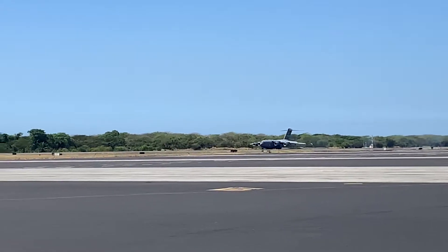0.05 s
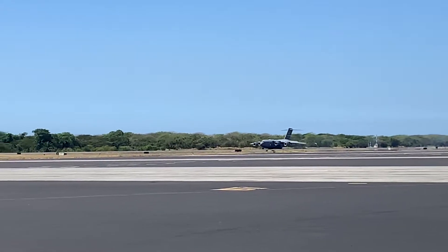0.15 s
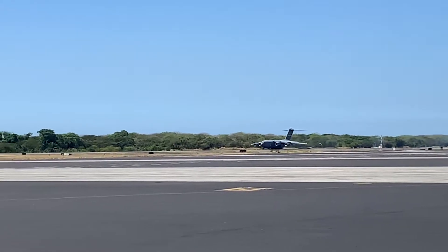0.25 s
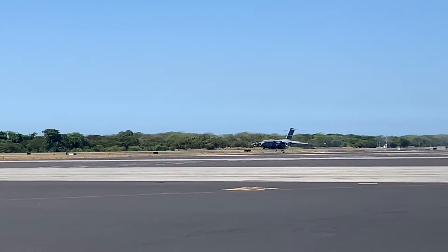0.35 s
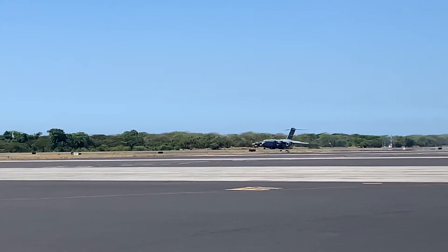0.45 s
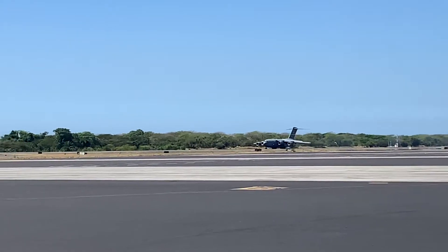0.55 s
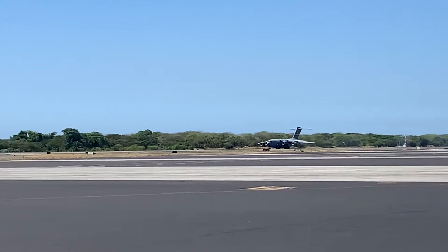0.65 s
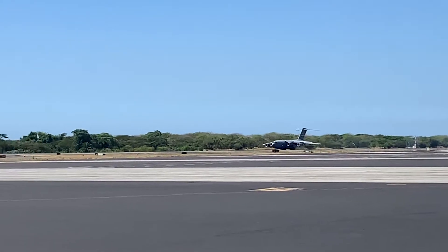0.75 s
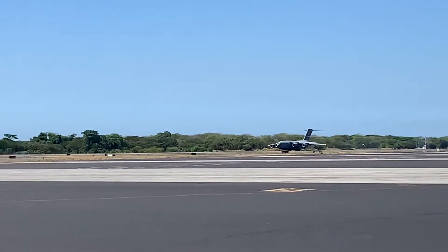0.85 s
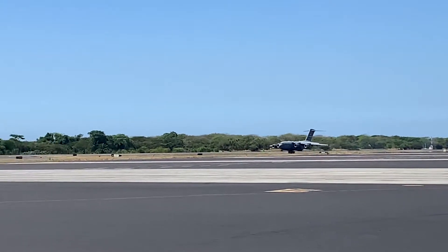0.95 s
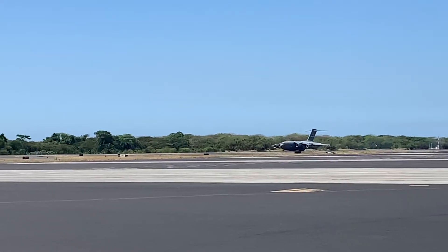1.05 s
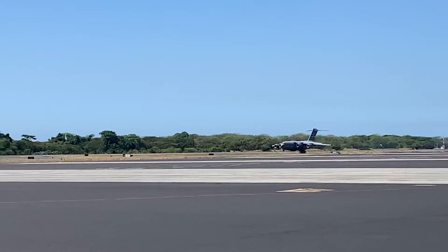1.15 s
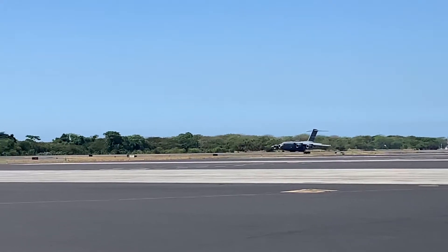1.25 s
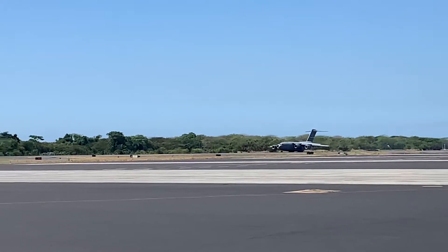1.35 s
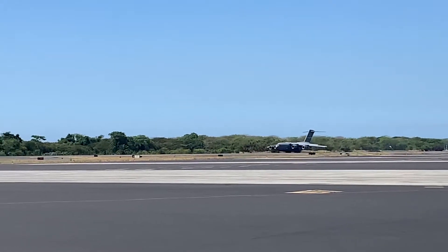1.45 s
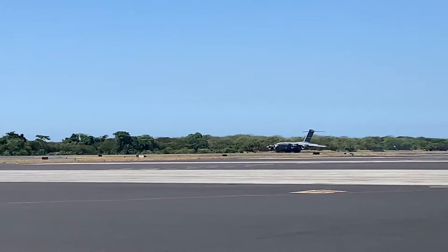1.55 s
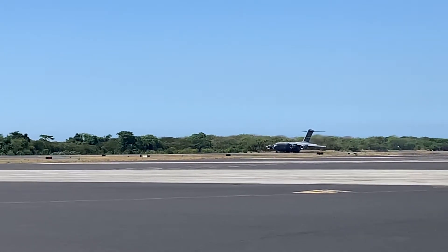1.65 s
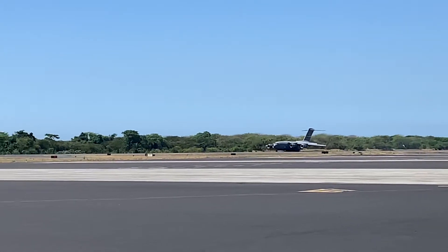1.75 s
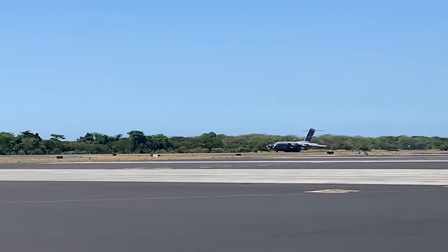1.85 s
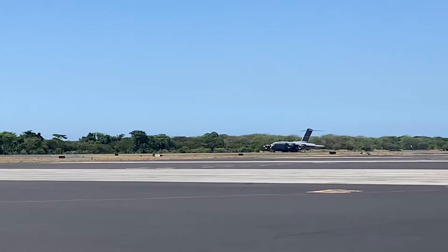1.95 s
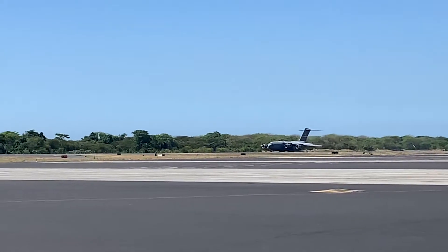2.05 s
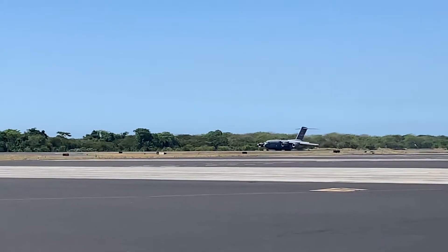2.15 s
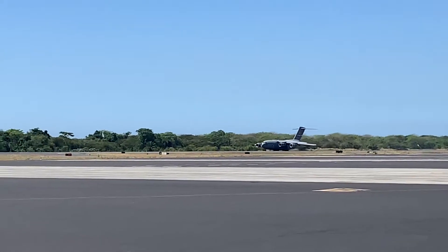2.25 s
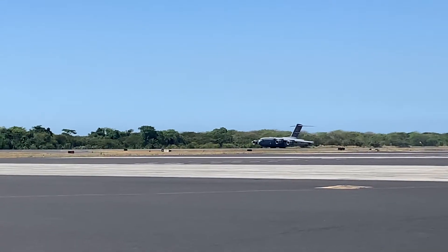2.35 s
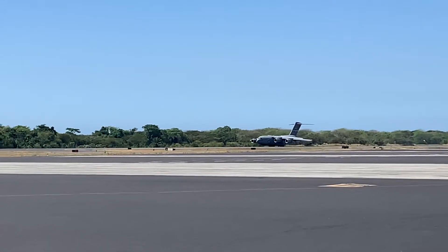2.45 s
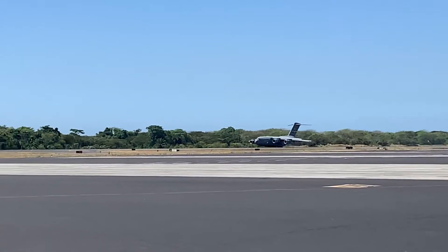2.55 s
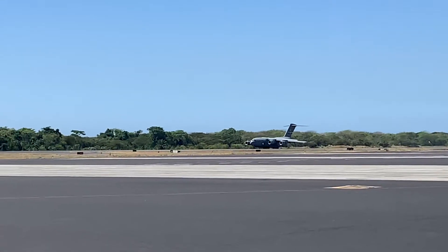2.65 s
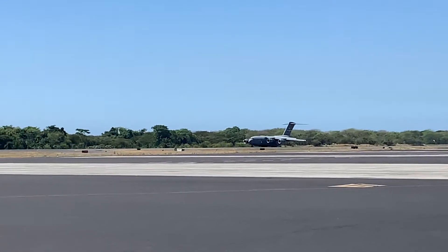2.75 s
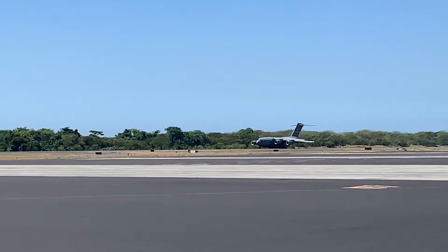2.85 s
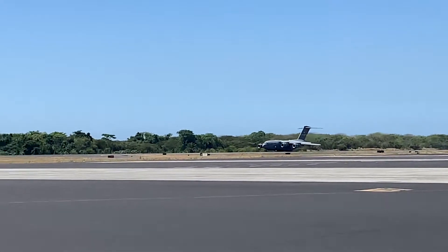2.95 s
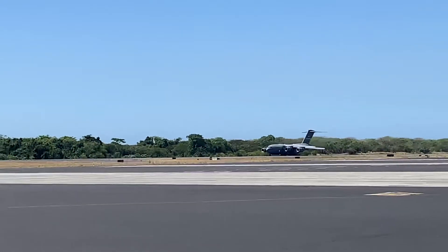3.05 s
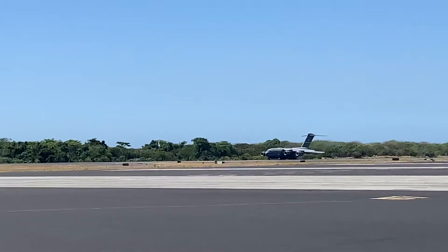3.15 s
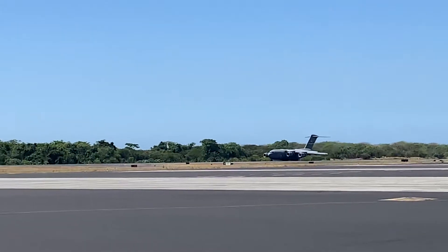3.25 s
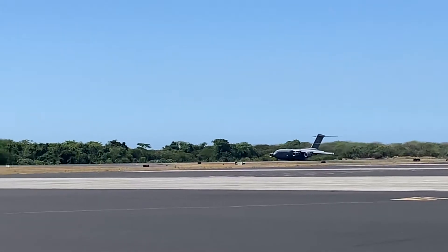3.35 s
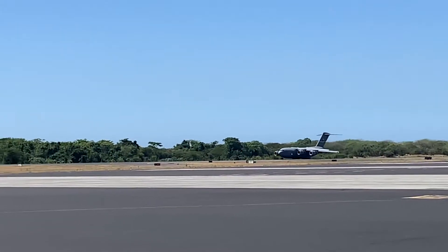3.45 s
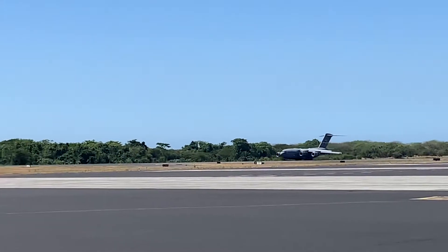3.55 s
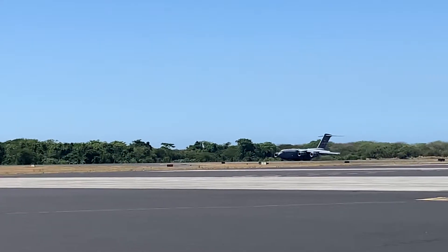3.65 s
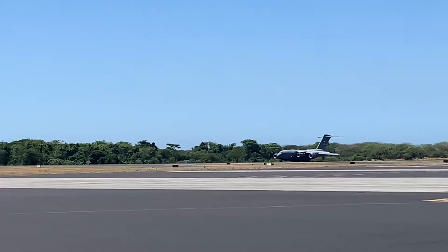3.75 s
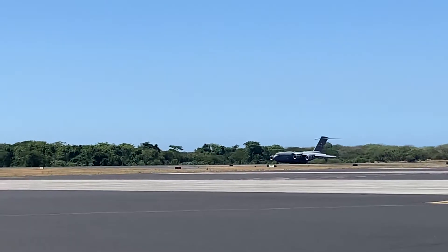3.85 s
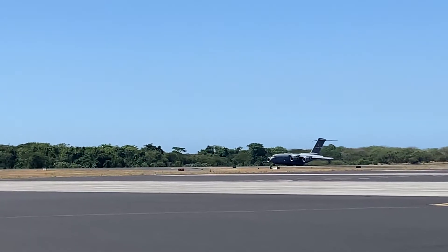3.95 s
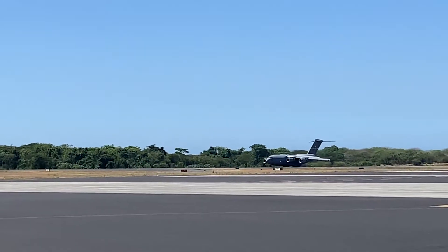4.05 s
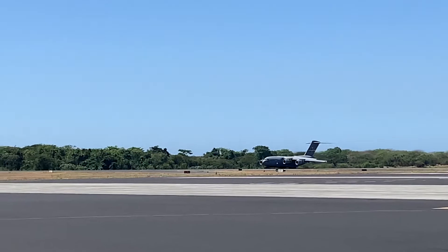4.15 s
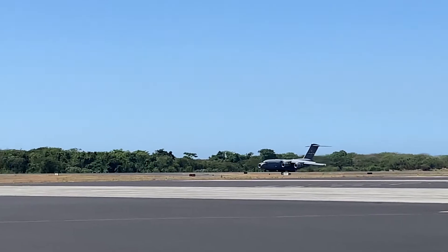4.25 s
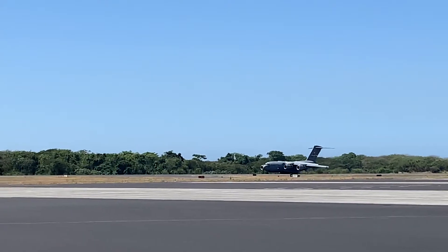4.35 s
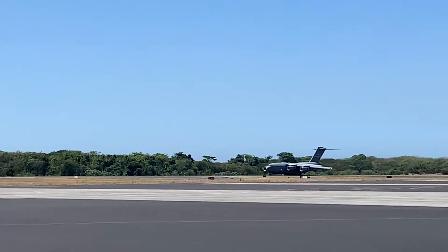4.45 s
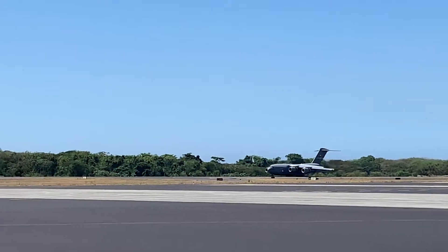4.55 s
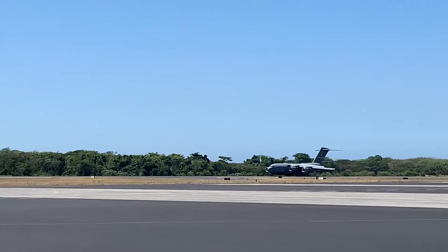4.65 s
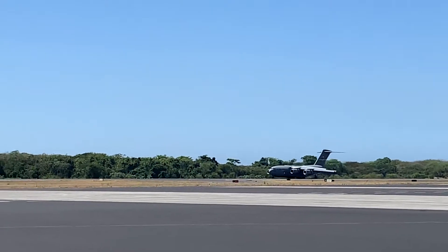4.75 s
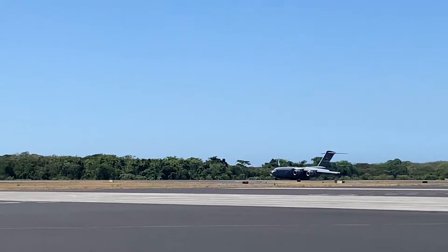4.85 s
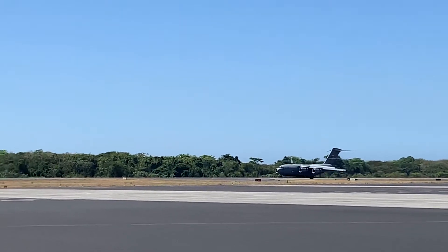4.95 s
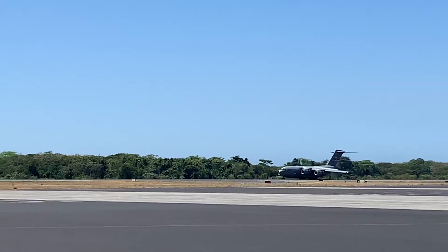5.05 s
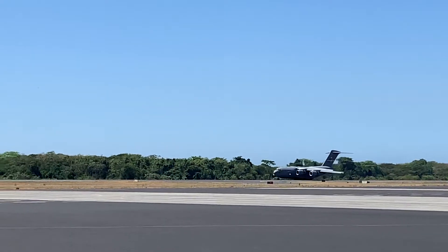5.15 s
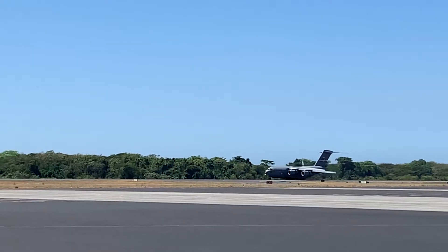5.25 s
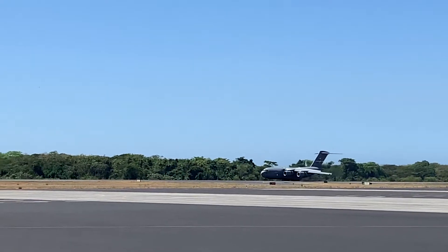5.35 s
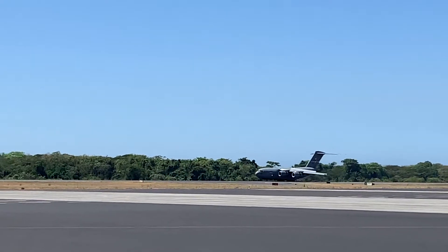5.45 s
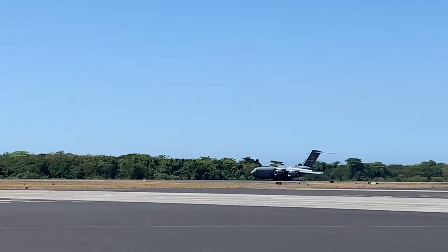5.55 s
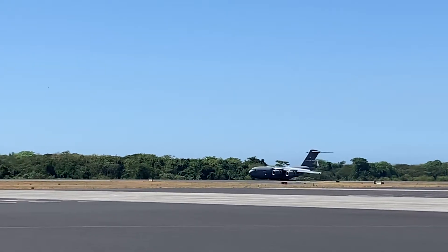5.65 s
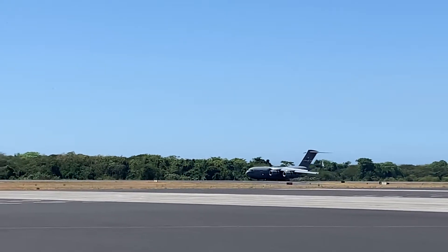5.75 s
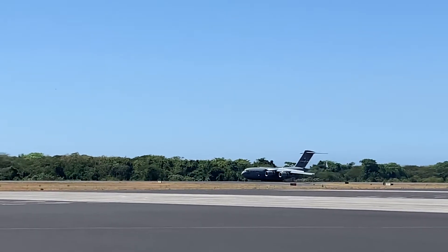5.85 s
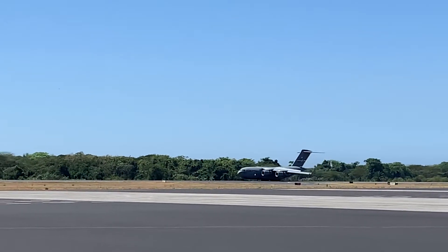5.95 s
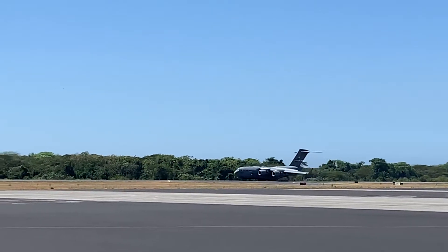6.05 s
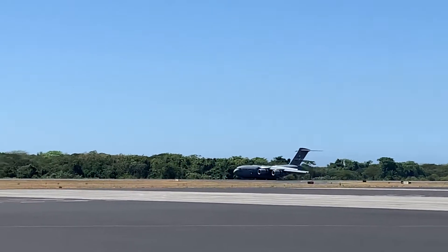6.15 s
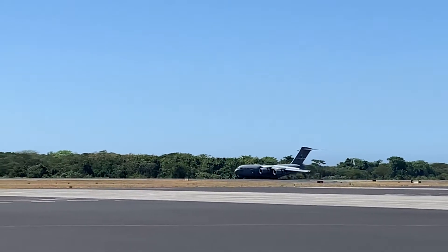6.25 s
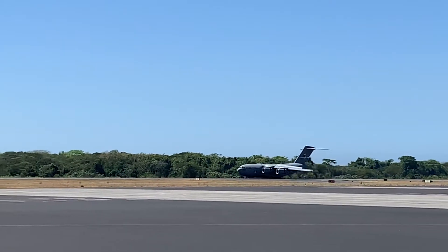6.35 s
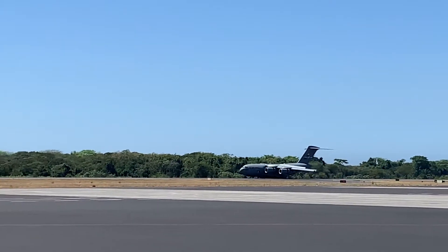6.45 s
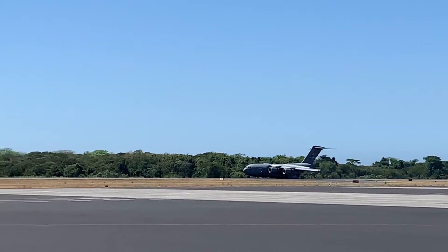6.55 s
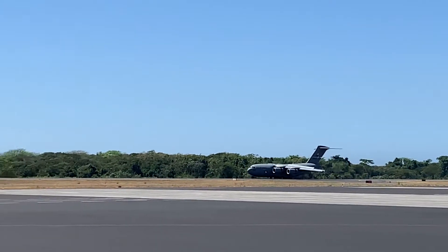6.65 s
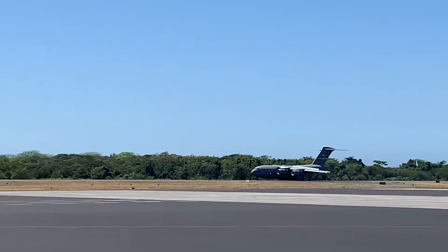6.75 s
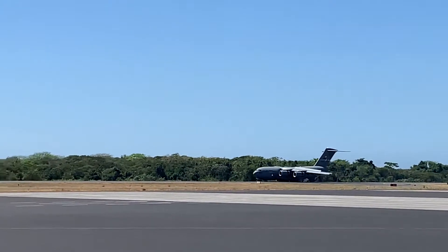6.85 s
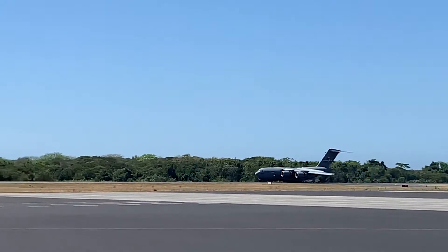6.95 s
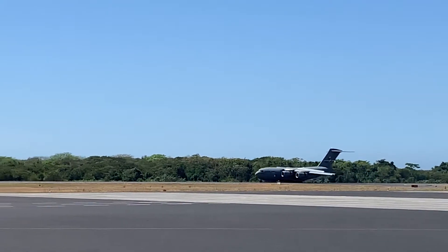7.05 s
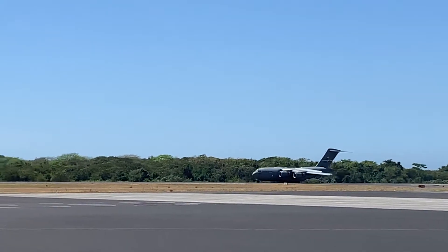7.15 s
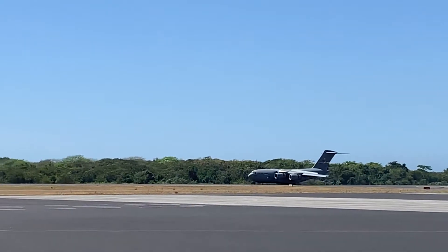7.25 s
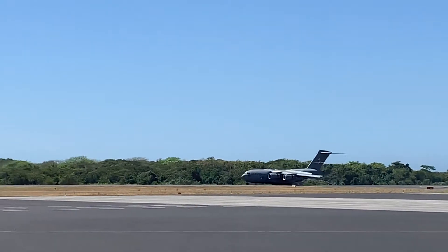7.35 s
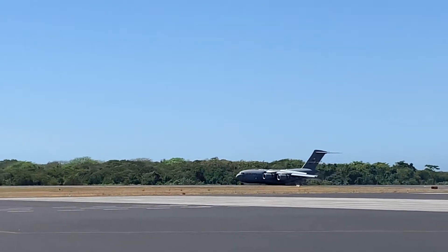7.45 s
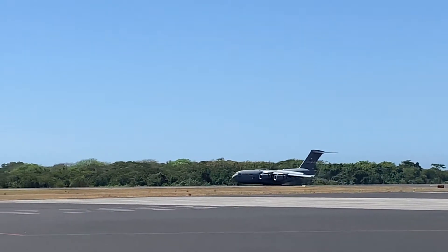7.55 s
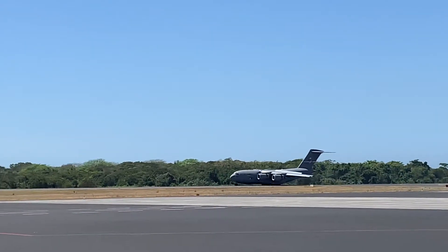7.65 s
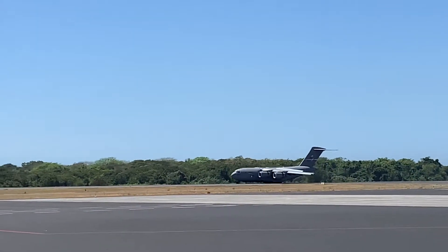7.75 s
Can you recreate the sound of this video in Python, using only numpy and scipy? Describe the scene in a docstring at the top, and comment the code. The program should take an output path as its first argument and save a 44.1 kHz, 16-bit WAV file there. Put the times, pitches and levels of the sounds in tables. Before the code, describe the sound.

Open airfield, heard from across the tarmac by a small stereo device. Jet engines wind down with a high, blurred whine and softening rush, reach a quiet lull, then whistle thinly and spool upward. Low rumble, roaring exhaust and coarse hiss grow in wavering gusts, hollowed by a close reflection, until they dominate. One minute bright click comes midway; no other activity is heard.

```python
"""A brighter recorder hiss fades at the opening and leaves a faint, steady high hiss (filtered noise).
A four-engined jet transport rolls along a distant runway: its compressors, gliding blade tones, whine down
beside a fading whirr in the ducts, over soft exhaust noise. A thin whistle of narrow-band noise rises and
blurs, then the compressors spool up again; a tiny tick passes. As thrust builds and the exhausts turn this
way, roar and hiss, bands of turbulent noise, swell over the whine. Moving air makes the sound waver, and a
close reflection hollows it at slowly shifting pitches."""
import sys
import numpy as np
from scipy import signal
from scipy.fft import rfft, irfft, next_fast_len
from scipy.io import wavfile
from scipy.ndimage import uniform_filter1d, minimum_filter1d

SR = 44100
rng = np.random.default_rng(int(sys.argv[2]) if len(sys.argv) > 2 else 0)


def transcribe(u):
    """Save the signal u as a 16-bit wav file named by the first command-line argument.

    u: samples, shape (n,) or (channels, n), limited to [-1, 1]; the rate is SR.
    q: integer samples, one column per channel.
    """
    v = np.clip(np.atleast_2d(u).T, -1, 1)
    q = np.round(v * 32767).astype(np.int16)
    wavfile.write(sys.argv[1], SR, q)


N = 344421
TIME = np.arange(N) / SR  # s
BINS = np.maximum(np.fft.rfftfreq(N, 1 / SR), 1)  # Hz


def undb(db):
    """Decibel definition: amplitude gain is ten to the power of dB / 20."""
    return 10 ** (np.asarray(db) / 20)


def curves(table):
    """Linear interpolation: each column of a table becomes a course in time."""
    s, *columns = np.transpose(table)
    return [np.interp(TIME, s, column) for column in columns]


def colour(points):
    """Spectral shaping: gain at every frequency, interpolated in dB over log frequency."""
    hz, db = np.transpose(points)
    return undb(np.interp(np.log(BINS), np.log(hz), db))


def unit(x):
    """Normalization: scale to an rms of 1."""
    return x / np.sqrt(np.mean(x ** 2))


def walk(rate):
    """Band-limited random fluctuation: about rate turns a second, spread 1."""
    steps = signal.resample_poly(rng.standard_normal(4096), 8, 1)
    return np.interp(TIME * rate * 8 + 80, np.arange(len(steps)), steps)


def turn(at_s, over_s):
    """Smooth transition: a hyperbolic tangent step from 0 to 1."""
    return (1 + np.tanh((TIME - at_s) / over_s)) / 2


def even(pair, over_s=.3, share=.75):
    """Steady source power: dividing by the running rms tames slow surges and leaves quick flutter."""
    power = uniform_filter1d(pair[0] ** 2, int(over_s * SR)) + 1e-9
    return pair / power ** (share / 2)


# Scattered (side) over direct (mid) sound; columns: f/Hz, level/dB
SCATTERING = [(30, -17.5), (70, -19), (120, -22), (250, -15.5), (520, -4.5), (800, -5), (1080, -6),
              (1400, -6), (1700, -3), (2050, -6), (2900, -7), (3800, -11.5), (4500, -8), (5200, 0.5),
              (9000, -8.5)]


def turbulence(spectrum):
    """Filtered white noise: a mid of one colour and a side further shaped by the scattering curve, both falling
    steeply beyond the ends; mid has spread 1."""
    beyond = np.minimum(BINS / spectrum[0][0], 1) * np.minimum(spectrum[-1][0] / BINS, 1)
    mid_gain = colour(spectrum) * beyond ** 6  # 36 dB per octave
    size = next_fast_len(N, True)
    grid = np.fft.rfftfreq(size, 1 / SR)
    gains = [np.interp(grid, BINS, gain) for gain in (mid_gain, mid_gain * colour(SCATTERING))]
    noise = rng.standard_normal((2, size))
    pair = irfft(rfft(noise) * gains, size)[:, :N]
    return pair / np.std(pair[0])


def tone(hz, width_hz, flutter_db, side_db):
    """Random modulation: noise on both quadratures of a gliding carrier smears it into a narrow band."""
    phase = 2 * np.pi * np.cumsum(hz) / SR
    cos, sin = np.cos(phase), np.sin(phase)
    mid, side = (unit(walk(width_hz) * cos + walk(width_hz) * sin) for _ in range(2))
    return np.array([mid, side * undb(side_db)]) * undb(flutter_db * walk(5.2))


# Spectral shape of the high hiss; columns: f/Hz, relative level/dB
HIGH_HISS_SPECTRUM = [(5000, -2.5), (7200, -5.5), (8500, -2), (10000, -15), (11500, -13)]
HIGH_HISS_DB = -76  # of the steady part


def high_hiss(extra_db=16, fade_s=0.17):
    """Broadband noise: a faint steady high hiss, with brighter recorder hiss that fades at the opening."""
    return undb(HIGH_HISS_DB + extra_db * np.exp(-TIME / fade_s)) * turbulence(HIGH_HISS_SPECTRUM)


# Main blade tone of an engine at relative speed 1; columns: t/s, f/Hz
BLADE_PITCH = [(0, 4830), (.55, 4385), (.9, 4170), (1.38, 3720), (1.75, 3420), (2.15, 3160), (2.6, 2965),
               (3, 2915), (3.5, 2950), (4, 3110), (5, 3240), (7.8, 3330)]
# The four engines; columns: relative speed slowing, relative speed spooling up,
# level slowing/dB, level spooling up/dB
ENGINES = [(1, 1, -2, -5), (.974, .972, -7.5, -6.5), (1.009, 1.022, -8, -6), (.988, 1.045, -11, -8)]
# Pitch of the main, middle and lowest blade row relative to the main tone
ROW_RATIOS = (1, .868, .8)
# Each row beams its own way; columns: t/s, main row level/dB, middle row level/dB, lowest row level/dB,
# to which the engine level is added
ROW_LEVELS = [(0, -56, -52, -57), (.3, -55.5, -53, -49), (.6, -54, -51, -51), (.87, -46.5, -53, -43.5),
              (1.15, -52.5, -52, -48), (1.4, -45.5, -42.5, -52), (1.7, -50.5, -48, -51), (2, -50, -54, -58),
              (2.3, -50.5, -54, -61), (2.6, -49, -60, -52), (3, -52.5, -53, -57), (3.5, -49.5, -57, -51.5),
              (3.9, -47, -54.5, -52), (5, -49.5, -55, -58.5), (6.2, -45, -49.5, -50.5),
              (6.55, -34.5, -46, -50), (6.9, -40.5, -49.5, -52.5), (7.8, -44, -47, -53.5)]
SHAFT_WANDER = 0.003  # share by which each shaft's speed wavers


def compressors(width_hz=65, flutter_db=1.1, fading_db=1.1, side_db=-11.0):
    """Blade-passing tones: pitch follows shaft speed; shafts drift apart and moving air broadens the lines."""
    hz, = curves(BLADE_PITCH)
    spooling = turn(at_s=3.7, over_s=.25)
    rows_db = [db + fading_db * walk(11) for db in curves(ROW_LEVELS)]
    out = 0
    for slowing, rising, slowing_db, rising_db in ENGINES:
        mean_speed = slowing + (rising - slowing) * spooling
        speed = mean_speed * (1 + SHAFT_WANDER * walk(9))
        engine_db = slowing_db + (rising_db - slowing_db) * spooling
        for ratio, row_db in zip(ROW_RATIOS, rows_db):
            line = tone(hz * speed * ratio, width_hz, flutter_db, side_db)
            out = out + undb(engine_db + row_db) * line
    return out


# Loudness of the jets, sinking as they idle and climbing with thrust; columns: t/s, level/dB
JET_LEVEL = [(0, -38), (0.2, -37), (1.0, -41.5), (1.5, -41.8), (2.0, -45.5), (2.8, -46.5), (3.4, -45),
             (4.4, -41.5), (5.0, -36.5), (5.8, -30), (6.22, -30), (6.46, -27.5), (7.1, -27.5),
             (7.45, -27.5), (7.63, -29.5), (7.81, -30)]
FULL_THRUST_DB = -27  # reference for JET_LEVEL


def thrust_db():
    """Relative level: loudness of the jets with respect to full thrust."""
    return curves(JET_LEVEL)[0] - FULL_THRUST_DB


def resonance(hz, level_db, width_hz, side_db):
    """Resonance: noise concentrated in a band round a moving centre frequency."""
    return undb(level_db) * even(tone(hz, width_hz, flutter_db=1.0, side_db=side_db))


# Hollow howl of the ducts; columns: t/s, f/Hz
HOWL_PITCH = [(0, 638.4), (.7, 635.7), (3.3, 790.3), (7.8, 849.4)]
WHIRR_HZ, WHIRR_SAG_HZ_PER_S = 1632, 33  # pitch at the start and its fall
WHIRR_DB, WHIRR_FADE_DB_PER_S, WHIRR_END_S = -37.5, 5.5, 1.83  # level at the start, decay, final drop
DRONE_HZ, DRONE_RISE_HZ, DRONE_RISE_S = 263.6, 38.9, 6.5  # steps up as full thrust is reached
# level in the drone's beam, and the changes before the beam arrives and once it has passed
DRONE_DB, DRONE_ASIDE_DB, DRONE_THIN_DB = -24.5, -24.5, -6.5


def ducts(howl_db=-35, howl_follow=0.68, whirr_drop_db=-25):
    """Duct resonance: a whirr that dies away, a howl that follows thrust and a drone that swells and steps up."""
    drone_hz = DRONE_HZ + DRONE_RISE_HZ * turn(DRONE_RISE_S, over_s=.4)
    drone_db = DRONE_DB + DRONE_ASIDE_DB * (1 - turn(at_s=4.22, over_s=0.98))
    drone_db = drone_db + DRONE_THIN_DB * turn(at_s=6.07, over_s=.2)
    whirr_hz = WHIRR_HZ - WHIRR_SAG_HZ_PER_S * TIME
    whirr_db = WHIRR_DB - WHIRR_FADE_DB_PER_S * TIME + whirr_drop_db * turn(WHIRR_END_S, over_s=0.23)
    howl_hz, = curves(HOWL_PITCH)
    drone = resonance(drone_hz, drone_db, width_hz=80, side_db=-11.5)
    howl = resonance(howl_hz, howl_db + howl_follow * thrust_db(), width_hz=220, side_db=-8.0)
    whirr = resonance(whirr_hz, whirr_db, width_hz=220, side_db=-9.0)
    return drone + howl + whirr


# Close reflection; columns: t/s, delay/ms, strength (0-1, before each layer's share of it)
REFLECTION = [(0, 2.29, 0.4), (1.2, 2.2, 0.06), (2, 2.17, 0.18), (3, 2.0, .28), (4, 1.87, 0.47),
              (6, 1.85, 0.36), (7.8, 1.82, 0.17)]


def eddies(spectrum, level_db, waver_db, waver_rate, reflect, count=6, stray=0.11, stray_rate=9):
    """Comb filtering: an inverted echo, of share reflect, hollows the noise of one size of eddies."""
    mid, side = turbulence(spectrum)
    delay_ms, strength = curves(REFLECTION)
    mid = mid - reflect * strength * np.interp(TIME - delay_ms / 1000, TIME, mid)
    # stray paths through moving air come and go, so neighbouring pitches swell apart
    lags = rng.integers(SR // 4000, SR // 150, count)  # samples
    strays = sum(walk(stray_rate) * np.pad(mid, (lag, 0), "reflect")[:N] for lag in lags)
    mid = unit(mid + stray * strays)
    return even(np.array([mid, side])) * undb(level_db + waver_db * walk(waver_rate))


def beam(full_db, follow, aside_db, at_s, over_s):
    """Directivity: level follows thrust (dB per dB), offset by aside_db until the beam reaches the listener."""
    return full_db + follow * thrust_db() + aside_db * (1 - turn(at_s, over_s))


# Level of the deep roar, which the exhausts beam backwards; columns: t/s, level/dB
ROAR_LEVEL = [(0, -26.5), (0.4, -29), (0.8, -28.5), (1.25, -26.5), (2.0, -32.5), (2.9, -33), (3.7, -30.5),
              (4.35, -28), (4.65, -22.5), (5.1, -20), (5.9, -15.0), (6.25, -14.5), (6.85, -12),
              (7.25, -12.5), (7.81, -18.5)]
FULL_BASS_DB = -14  # reference for ROAR_LEVEL


def bass_db():
    """Relative level: the deep roar with respect to its reference."""
    return curves(ROAR_LEVEL)[0] - FULL_BASS_DB


# Spectral shapes of the exhaust layers, from the largest eddies to the finest;
# columns of each: f/Hz, relative level/dB
RUMBLE_SPECTRUM = [(15, -23.5), (27, -14), (40, -15.5), (52, -1), (63, 1.5), (78, -1), (92, -7),
                   (130, -21.5)]
ROAR_SPECTRUM = [(62, -20.5), (85, 2.5), (103, 4.5), (135, -1), (175, -2), (230, -5), (280, -7.5),
                 (355, -7), (450, -14.5), (700, -27.5)]
RUSH_SPECTRUM = [(280, -26.5), (400, 0.5), (540, 5), (660, 1), (850, -1.5), (1080, -2), (1400, -3),
                 (1650, -5), (1900, -11), (2700, -31.5)]
HISS_SPECTRUM = [(1300, -9.5), (1880, 2.5), (2200, 3), (2410, -1), (2640, 2.3), (2940, -4), (3280, 0.5),
                 (3720, -2.5), (4080, -2.5), (4480, -11.5), (4750, -17), (5100, -19.5), (6000, -46.5)]
SIZZLE_SPECTRUM = [(3400, -19), (4400, 11.5), (4900, 3.5), (5250, -1), (6100, -1), (7000, -9), (7800, -16),
                   (8800, -43.5), (13000, -30.5)]
# Rumble of the largest eddies; columns: t/s, level/dB
RUMBLE_LEVEL = [(0, -22.5), (.35, -26.5), (.8, -30), (1.15, -27.5), (1.9, -28), (2.9, -30), (3.75, -25),
                (4.2, -28), (4.5, -23.5), (4.72, -23), (5.05, -17), (5.9, -18), (6.12, -19), (6.55, -17),
                (7.25, -18), (7.81, -19.5)]
ROAR_DB = -15  # where the deep roar meets its reference


def exhaust():
    """Jet mixing noise: large eddies rumble, smaller ones roar and hiss, each with its own directivity."""
    rumble_db, = curves(RUMBLE_LEVEL)
    roar_db = ROAR_DB + bass_db()
    rush_db = beam(full_db=-22.5, follow=0.88, aside_db=2.5, at_s=1.4, over_s=0.73)
    hiss_db = beam(full_db=-24.5, follow=1.0, aside_db=-1, at_s=5.6, over_s=0.91)
    sizzle_db = beam(full_db=-36.5, follow=1.04, aside_db=-12.0, at_s=3.17, over_s=2.6)
    rumble = eddies(RUMBLE_SPECTRUM, rumble_db, waver_db=0.5, waver_rate=7.5, reflect=.05)
    roar = eddies(ROAR_SPECTRUM, roar_db, waver_db=0.82, waver_rate=18, reflect=0.092)
    rush = eddies(RUSH_SPECTRUM, rush_db, waver_db=0.78, waver_rate=28, reflect=1)
    hiss = eddies(HISS_SPECTRUM, hiss_db, waver_db=0.87, waver_rate=28, reflect=0.044,
                  stray=.15, stray_rate=14)
    sizzle = eddies(SIZZLE_SPECTRUM, sizzle_db, waver_db=1.1, waver_rate=11, reflect=.1)
    return rumble + roar + rush + hiss + sizzle


# Brief or slow swells of single ranges of pitches;
# columns: t/s, half length/s, centre f/Hz, half width/octaves, gain/dB
SWELLS = [(0.1, .2, 910, 1.4, 2), (0.1, .25, 190, .3, 5), (0.562, 0.1, 664, 0.89, 3.5),
          (1.4, 0.25, 340, 0.42, 2.5), (1.7, 0.95, 1066, 0.17, 3), (1.904, 0.32, 103, 0.4, 5),
          (3.397, 0.35, 820, 0.76, 8), (4.65, 1, 105, 0.31, 3.5), (4.93, 0.31, 530, .35, 4),
          (6.6, 0.27, 851, 1, 2), (7.4, 0.18, 800, 0.49, 4.5), (7.462, 0.18, 3410, .8, 3.5)]


def swell_ranges(sound):
    """Time-varying equalization: brief or slow swells, each lifting one range of pitches."""
    size = next_fast_len(N, True)
    spectrum = rfft(sound, size)
    grid = np.maximum(np.fft.rfftfreq(size, 1 / SR), 1)
    out = sound
    for s, half, hz, octaves, db in SWELLS:
        band_gain = np.exp(-np.square(np.log2(grid / hz) / octaves))
        band = irfft(spectrum * band_gain, size)[:, :N]
        swell_db = db * np.exp(-np.abs((TIME - s) / half) ** 2.8)  # a bell with a flattened top
        out = out + (undb(swell_db) - 1) * band
    return out


# Whistle that rises ahead of the spool-up; columns: t/s, f/Hz, level/dB
WHISTLE = [(1.9, 3220, -70), (2.4, 3334, -64), (2.65, 3494, -57), (2.85, 3650, -56), (3.2, 3690, -62),
           (4, 3820, -51.5), (5, 4080, -47.5), (5.85, 4340, -42), (7.8, 4405, -44)]


def whistle(blur_s=3.0):
    """Spectral broadening: a thin rising whistle crossfades into a wider band of hiss at the same pitch."""
    hz, level_db = curves(WHISTLE)
    blur = turn(blur_s, over_s=.12)
    thin = tone(hz, width_hz=59, flutter_db=2.0, side_db=-10.5)
    broad = tone(hz, width_hz=480, flutter_db=1.0, side_db=-5)
    return undb(level_db) * ((1 - blur) * thin + blur * broad)


TICK_S, TICK_HZ, TICK_DB = 4.814, 8460, -42  # onset, spectral peak, level of the main burst at onset


def tick(ring_s=0.00169, tail_s=0.014, tail_db=-19):
    """Exponential decay: a tiny, bright noise burst close to the microphone, with a weaker, longer tail."""
    age = np.maximum(TIME - TICK_S, 0)
    decay = np.exp(-age / ring_s) + undb(tail_db) * np.exp(-age / tail_s)
    envelope = (age > 0) * decay
    return undb(TICK_DB) * envelope * turbulence([(6500, -15), (TICK_HZ, 0), (9500, -10), (11500, -20)])


# Lead of the right port over the left; columns: f/Hz, phase/rad
PORT_PHASE = [(30, 0.29), (200, 0.33), (520, 0.32), (780, 0.35), (1200, 0.54), (1650, 0.74), (2150, 0.83),
              (2500, .25), (2840, .65), (3100, .15), (4550, -0.14), (5170, 1.5), (6100, -1), (7100, 1.7)]
# Left port over right port; columns: f/Hz, level/dB
PORT_BALANCE = [(30, -2), (80, -1.2), (170, -1.5), (350, -0.5), (700, -1.4), (1400, -.5), (2800, -.8),
                (6000, -2)]


def ports(mid, side):
    """Phase and level differences: two microphone ports hear out of step, the right a little louder."""
    size = next_fast_len(N, True)
    grid = np.fft.rfftfreq(size, 1 / SR)
    lead = np.interp(grid, *np.transpose(PORT_PHASE))
    # a phase step between the ports is a quarter-turned copy of the mid in the side
    side = side - irfft(1j * np.tan(lead / 2) * rfft(mid, size), size)[:N]
    tilt = np.sqrt(np.interp(grid, BINS, colour(PORT_BALANCE)))  # half the balance for each port
    left_right = rfft(np.array([mid + side, mid - side]), size)
    return irfft(left_right * [tilt, 1 / tilt], size)[:, :N]


def scene():
    """Superposition: the aircraft, the tick and the high hiss add up at the microphone ports."""
    jets = swell_ranges(exhaust() + ducts())
    mid, side = jets + compressors() + whistle() + tick() + high_hiss()
    return ports(mid, side)


CEILING, TOP_HZ = .94, 11500  # limiter threshold (full scale 1), low-pass edge


def record(dry):
    """Limiting and low-pass filtering: gain eases down the highest peaks, soft ends, and the top is cut."""
    room = CEILING / np.maximum(np.abs(dry).max(axis=0), CEILING)
    gain = uniform_filter1d(minimum_filter1d(room, size=881), size=441)  # 20 ms hold, 10 ms smoothing
    ends = np.minimum(np.minimum(TIME, TIME[-1] - TIME) / .003, 1)  # 3 ms fades
    low_pass = signal.ellip(8, .2, 70, TOP_HZ, fs=SR, output="sos")
    return signal.sosfilt(low_pass, dry * gain * ends)


dry = scene()
out = record(dry)
transcribe(out)
```